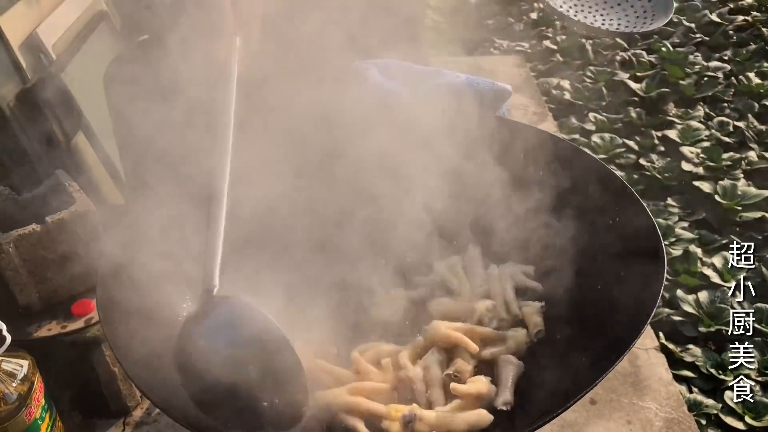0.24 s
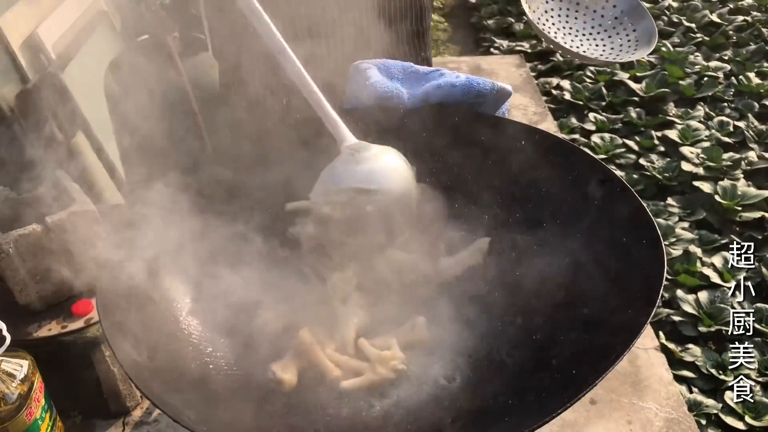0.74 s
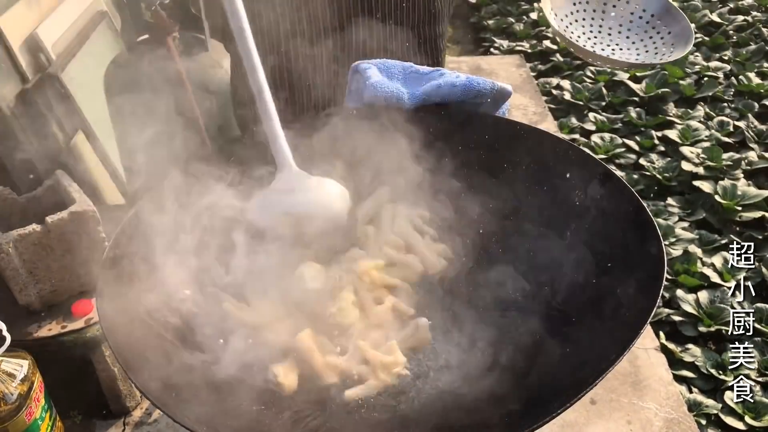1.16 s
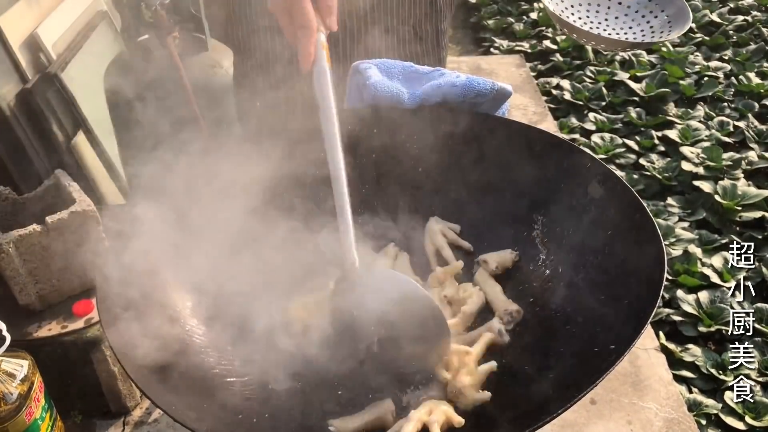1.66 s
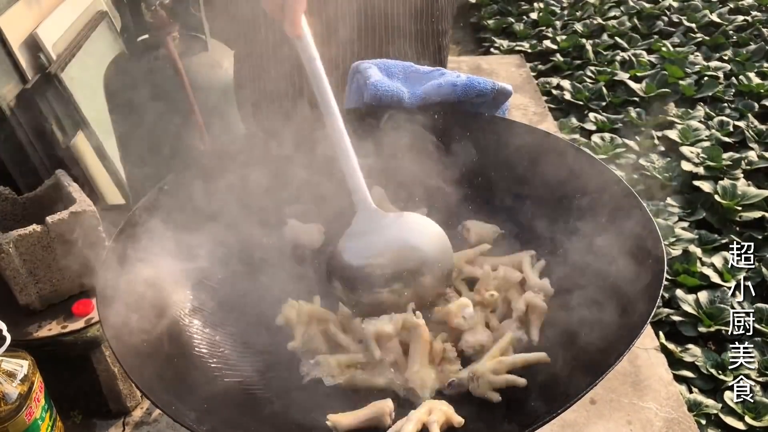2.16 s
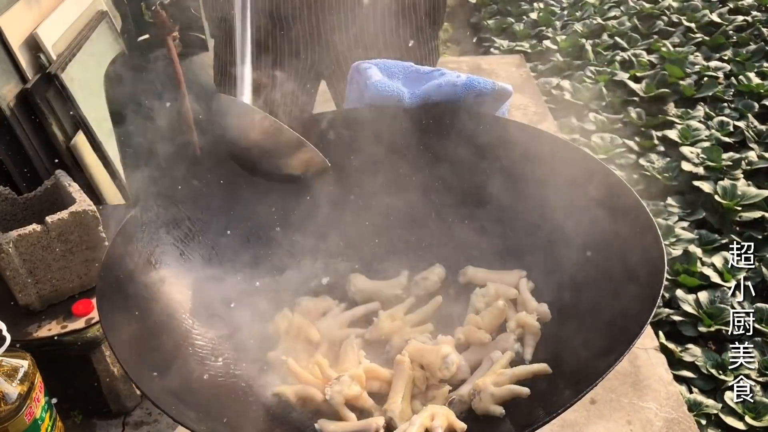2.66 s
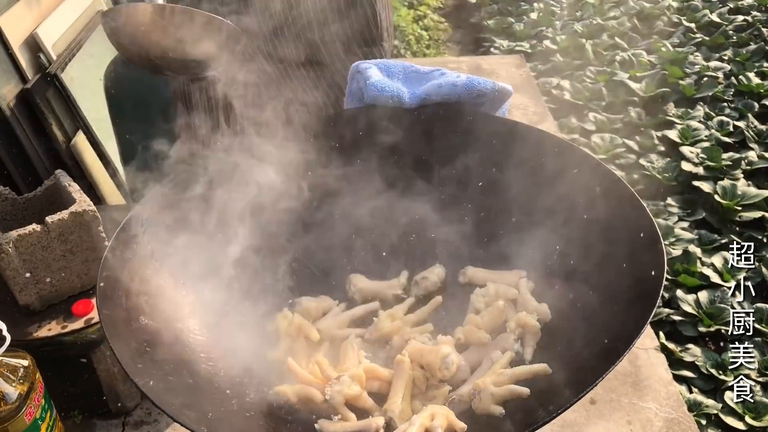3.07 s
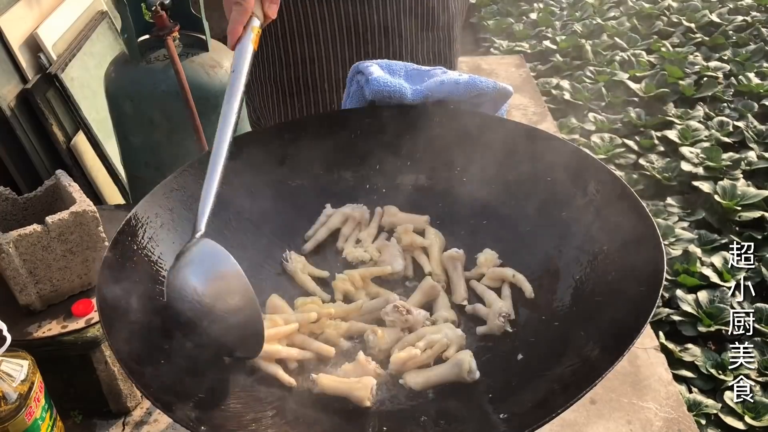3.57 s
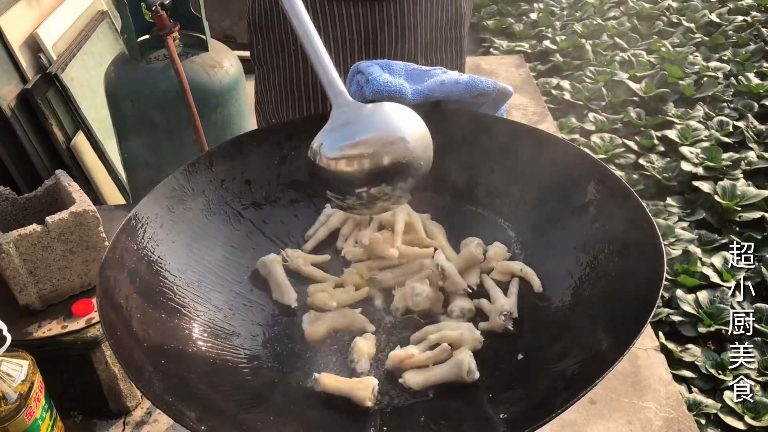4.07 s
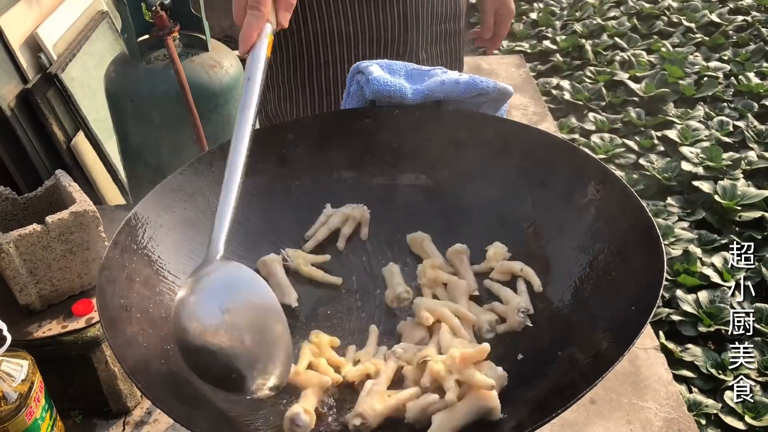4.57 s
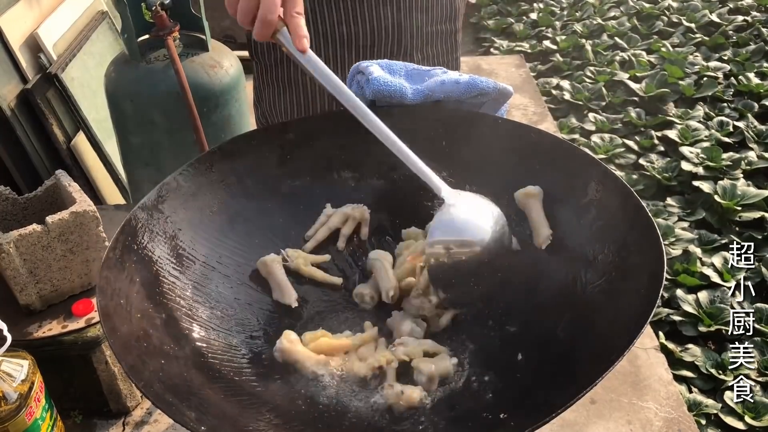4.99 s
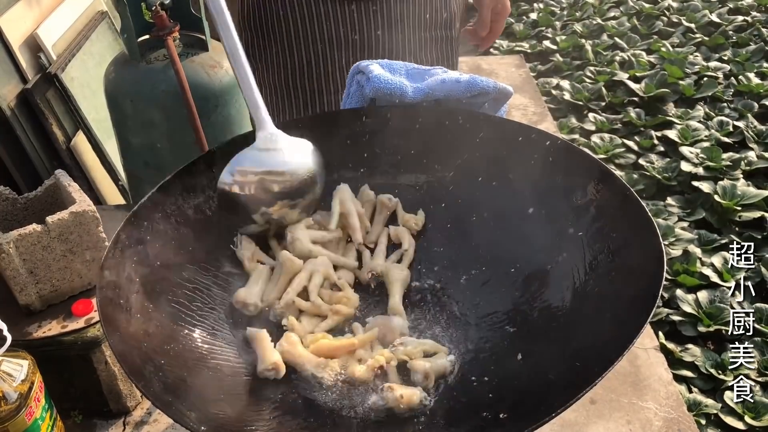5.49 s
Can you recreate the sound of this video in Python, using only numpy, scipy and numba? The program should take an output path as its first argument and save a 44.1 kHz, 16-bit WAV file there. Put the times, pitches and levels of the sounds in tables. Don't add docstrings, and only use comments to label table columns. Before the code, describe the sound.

Chicken feet sizzle violently in oil, close and dry, with no room echo. Bright hiss surges unevenly under hollow bursting bubbles and short soft ladle rubs on iron. A flurry of hard spits precedes a quieter, thinner fry; it swells back with scraping, small squeals and a late ladle knock. Burner rumble continues below, peaks clipped.

```python
import sys
import numpy as np
from scipy import signal
from scipy.fft import rfft, irfft, next_fast_len
from scipy.io import wavfile
from scipy.ndimage import uniform_filter1d, map_coordinates
from numba import njit

SR = 44100
rng = np.random.default_rng(int(sys.argv[2]) if len(sys.argv) > 2 else 0)


def gain_from_db(level_db):
    decades = np.asarray(level_db, float) / 20
    return 10 ** decades


def transcribe(signal):
    frames = np.atleast_2d(signal).T
    limited = np.clip(frames, -1, 1)
    pcm = np.round(limited * 32767).astype(np.int16)
    wavfile.write(sys.argv[1], SR, pcm)


N = 253127


def unit(x):
    return x / np.sqrt(np.mean(x ** 2) + 1e-20)


def curves(rows):
    s, *columns = np.transpose(rows)
    return [np.interp(np.arange(N) / SR, s, column) for column in columns]


def wobble(rate):
    knots = rng.standard_normal(int(N * rate / SR) + 4)
    return map_coordinates(knots, [np.arange(N) * rate / SR])


def filtered(x, response):
    m = next_fast_len(N + 8192)
    return irfft(rfft(x, m) * response(np.fft.rfftfreq(m, 1 / SR)), m)[:N]


def colour(points):
    f, db = np.transpose(points)
    return lambda hz: gain_from_db(np.interp(np.log(hz + 1), np.log(f + 1), db))


def resonance(f, hz, width_hz):
    return 1j * f * width_hz / (hz * hz - f * f + 1j * f * width_hz)


def rush(spectrum, patchy_db):
    z = signal.stft(rng.standard_normal(N), nperseg=256)[2]
    field = uniform_filter1d(rng.standard_normal(z.shape), 8, 0)
    field = unit(uniform_filter1d(field, 8, 1))
    patchy = signal.istft(z * gain_from_db(patchy_db * field), nperseg=256)[1][:N]
    return unit(filtered(patchy, colour(spectrum)))


def scatter(starts, shapes):
    where = np.clip(starts[:, None] + np.arange(shapes.shape[1]), 0, N)
    return np.bincount(where.ravel(), shapes.ravel(), N + 1)[:N]


def grains(count, size, hz, spread, cycles, scatter_db, cap_db):
    when, strength = rng.random((2, count))
    pitch = hz * np.exp(spread * rng.standard_normal((count, 1)))
    pitch = np.clip(pitch, 200, SR / 2.2)
    turns = pitch * np.arange(size) / SR
    peak = gain_from_db(np.minimum(-scatter_db * np.log(1 - strength), cap_db))[:, None]
    rings = peak * np.sin(2 * np.pi * turns) * gain_from_db(-30 * turns / cycles)
    return unit(scatter((when * N).astype(int), rings))


# (time [s], steam level [dB], boil under the food [dB], open view of the steam [dB], low when shaded)
FRY = [(0.0, -18, -20.5, -1), (0.3, -14.5, -17.5, -0.5), (1.12, -7.5, -14.5, 1), (1.32, -13, -10.5, -1),
       (1.56, -8, -18.5, 2), (1.9, -12, -22, 2), (2.33, -14.5, -20.5, 0), (2.8, -13, -18.5, 3),
       (3.2, -13.5, -20, 1), (3.55, -13, -16, -4), (3.68, -22.5, -30, -0.5), (4.05, -19, -33, 0.5),
       (4.3, -17, -37, -5.5), (4.46, -16, -30, -5), (4.53, -16.5, -19, 1.5), (5.16, -13, -28, -0.5),
       (5.5, -11.5, -22, -1), (5.74, -12.5, -14.5, -2.5)]
# (frequency [Hz], level [dB])
STEAM = [(1500, -20), (2400, -14), (3200, -4), (4200, -5), (5500, -6), (7500, -7.5), (10000, -11),
         (13000, -10), (16000, -6)]
FIZZ_DB, USUAL_STEAM_DB = -15, -13
FIZZ_FOLLOWS, FIZZ_SHADED = 0.42, 0.21


def sizzle():
    hiss_db, boil_db, bright_db = curves(FRY)
    fizz_db = FIZZ_DB - USUAL_STEAM_DB - (1 - FIZZ_FOLLOWS) * (hiss_db - USUAL_STEAM_DB)
    fizz_db = fizz_db - FIZZ_SHADED * bright_db
    hiss_db = hiss_db + gush_db()
    surge = 0.74 * wobble(14) + 0.083 * wobble(55) + 0.49 * wobble(200)

    crackle = grains(count=7000, size=48, hz=11000, spread=.36, cycles=7, scatter_db=4.6, cap_db=18.5)
    jets = rush(STEAM, patchy_db=1.0)
    steam = gain_from_db(-0.5) * jets + gain_from_db(-7.0) * unit(filtered(crackle, colour(STEAM)))
    top = filtered(steam, lambda f: 1 / (1 + (9000 / (f + 1)) ** 6))
    steam = steam + (gain_from_db(bright_db + 4 + 1.2 * wobble(40)) - 1) * top

    fizz = grains(count=9000, size=300, hz=3150, spread=.14, cycles=20, scatter_db=3.5, cap_db=12)
    boil = grains(count=6000, size=160, hz=2050, spread=.27, cycles=5, scatter_db=4.5, cap_db=11)
    snaps = grains(count=900, size=64, hz=3400, spread=.18, cycles=3, scatter_db=4.5, cap_db=11)
    ticks = grains(count=350, size=24, hz=13000, spread=.2, cycles=2, scatter_db=3, cap_db=9)
    steam = steam + gain_from_db(-12.5) * snaps + gain_from_db(-13.5) * ticks
    fizz_gain = gain_from_db(fizz_db - 6 + 0.11 * wobble(35) + 0.91 * wobble(7.01))
    hissing = gain_from_db(hiss_db + surge) * (steam + fizz_gain * fizz)
    return hissing + gain_from_db(boil_db - 7.0 + 3.4 * surge) * boil


# (centre time [s], half length
# [s], swell level [dB])
GUSHES = [(0.474, 0.045, 1), (0.77, 0.025, 6), (1.163, 0.054, 0), (1.6, .02, -2), (1.762, 0.019, 7.5),
          (2.146, 0.11, 2), (2.508, 0.14, 4), (3.228, 0.039, 2), (3.35, 0.045, 1), (3.52, .05, 3.5),
          (4.21, 0.057, -1), (4.75, 0.033, 1.5), (4.96, 0.048, 1), (5.17, 0.045, 3), (5.393, 0.083, -2),
          (0.214, 0.065, -1), (1.823, 0.022, -0.5), (5.525, 0.029, 2), (5.696, 0.024, 3)]


def gush_db():
    t = np.arange(N) / SR
    return sum(db * np.exp(-((t - s) / half) ** 2) for s, half, db in GUSHES)


# (time [s], peak level [dB], first pitch [Hz], ring length [cycles])
DEEP_POPS = [(0.2326, -8, 960, 3.1), (0.533, -4.5, 1090, 1.3), (0.6544, -1, 1390, 0.99),
             (0.7599, -2.5, 1350, 2.5), (0.8906, -7, 1020, 2.2), (0.9363, -3.5, 1110, 1.8),
             (0.992, 7, 820, 1.2), (1.009, 4, 1110, 1.6), (1.229, -1.5, 1050, 1.9), (1.2609, -2, 1010, 2.3),
             (1.2758, 4, 1060, 1.3), (1.3413, 1, 1690, 3.2), (1.3667, -3, 820, 1), (1.4544, 2, 1450, 2.7),
             (1.557, 1, 1270, 3.2), (1.63, -3, 1200, 2.3), (1.817, -6.5, 805, 1.5), (2.6429, 6, 1100, 1.7),
             (2.8623, 7.5, 1280, 2.2), (2.932, 0, 1170, 1.8), (3.099, -5, 1050, 2.2),
             (3.1552, -1.5, 1220, 1.5), (3.225, -1.5, 895, 2.6), (3.2847, -5, 1280, 2.3),
             (3.5509, -3.5, 750, 1.8), (3.5657, -1, 1310, 3.9), (3.7332, -6.5, 990, 1.8),
             (3.8224, -5, 1020, 3), (3.9663, 2, 1500, 3.7), (5.6635, -13, 790, 2.2)]
# (time [s], peak level [dB], first pitch [Hz], ring [cycles])
SURFACE_POPS = [(0.0904, -7, 1440, 2.5), (0.1322, -3, 1370, 1.1), (0.5816, -8, 1300, 4.5),
                (0.947, -10, 1500, 1.4), (1.1321, 1, 1520, 1.3), (1.247, -5, 1100, 2.5),
                (1.3465, 3, 1960, 4.6), (1.5001, 0, 1490, 0.89), (1.5413, -4, 1350, 5.4),
                (1.784, -2.5, 1400, 2.7), (2.1198, -5.5, 1440, 0.9), (2.1928, -2.5, 1370, 1.9),
                (2.2078, 3, 960, 3.8), (2.4315, -6, 1320, 2.1), (2.6897, 0.5, 1340, 0.81),
                (2.9195, -2, 1420, 1.7), (2.9937, -2, 1530, 0.99), (3.1126, -0.5, 1270, 1.7),
                (3.2116, -6, 1230, 1.9), (3.2325, 2, 1360, 1.4), (3.6209, -3, 1700, 2.2),
                (3.8804, -2.5, 1340, 0.68), (3.9478, 4, 1660, 2.1), (4.5145, -2, 1650, 1.3),
                (4.582, 0, 1380, 1), (4.6064, 3.5, 1610, 2.1), (4.752, -1, 1490, 1),
                (5.3061, -3, 1420, 0.92), (5.5455, 0, 1360, 1.5), (5.596, 0.5, 940, 3.3),
                (5.613, 0, 1500, 2.5)]
# (time [s],
# peak level [dB], first pitch [Hz])
LESSER_POPS = [(0.0261, -9.5, 1200), (0.3061, -13, 1230), (0.3748, -7, 1910), (0.5674, -10, 1080),
               (0.6036, -6.5, 1140), (0.671, -8, 1200), (0.768, -2, 1320), (1.098, -3, 1430),
               (1.1172, -5, 1250), (1.1655, -5, 1210), (1.4673, -1, 1390), (1.4883, -4, 1200),
               (1.597, -4, 1360), (1.7196, -9.5, 1520), (1.7688, -5, 1260), (1.969, -17, 1410),
               (2.852, -8, 1260), (2.984, -7, 1220), (3.0448, -8, 1490), (3.3495, -7, 1640),
               (3.4824, -8.5, 1210), (3.8375, -11, 1460), (3.9138, -3, 1430), (3.9258, -10, 1390),
               (3.954, -11, 1500), (3.959, -10, 1400), (3.972, -6, 1200), (3.9923, -7.5, 1360),
               (4.326, -10, 1430), (4.589, -5, 1390), (5.646, -10, 800), (5.671, -6, 900),
               (5.678, -11, 750)]
# (time [s], peak level [dB], first pitch [Hz])
TINY_POPS = [(0.01, -2.5, 904), (0.052, -10, 1030), (0.073, -11, 1760), (0.114, -6, 1710), (0.14, -2, 1890),
             (0.217, -8, 1650), (0.263, -16, 1930), (0.277, -7, 2150), (0.33, -3, 2220), (0.49, -10, 1270),
             (0.679, -5, 1670), (0.754, 1, 1770), (0.862, -6, 2240), (1.148, -5, 2080), (1.213, -6, 1840),
             (1.297, -7, 1550), (1.315, -7, 1860), (1.384, -4, 912), (1.408, -11, 2220), (1.524, -11, 2000),
             (1.751, 4, 1120), (1.955, -12, 1920), (1.96, -7, 1940), (2.082, -3, 1920), (2.097, -5, 1840),
             (2.15, -1, 1760), (2.17, 0, 2170), (2.264, -9, 1850), (2.387, -6, 1690), (2.517, 3, 1980),
             (2.594, -5, 1610), (2.616, 3, 2150), (3.01, -2, 1480), (3.03, -10, 1960), (3.375, -5, 2230),
             (3.41, -5, 2300), (3.446, -7, 1890), (3.638, -6, 1730), (3.666, -3, 2150), (4.212, -19, 2180),
             (4.334, -14, 2300), (4.359, -8, 2070), (4.412, -5, 1420), (4.448, -13, 1600),
             (4.479, -9, 1980), (4.569, -2, 1730), (4.964, -3, 1810), (5.164, -17, 1740),
             (5.443, -15, 2300), (5.468, -20, 2010), (5.491, -3, 1550), (5.516, -9, 1730)]
DEEP_BOOM_DB, SURFACE_BOOM_DB, BOOM_DB_PER_OCTAVE = -7, -16.5, -6
LESSER_CYCLES, LESSER_BOOM_DB = 2.4, -12
TINY_DB, TINY_CYCLES, TINY_BOOM_DB = -6, 2.7, -18
SMALL_DB, SMALL_SCATTER_DB, SMALL_BOOM_DB = -4, 1.5, -14.5
SMALL_HZ, SMALL_SPREAD, SMALL_CYCLES = 1400, .25, 2.5


def pockets(count=260):
    luck = rng.standard_normal((count, 4))
    jitter = .4 * luck[:, 0].clip(-1.2, 1.2)
    when = (np.arange(count) + .5 + jitter) / count * (N - 1)
    boil_db = curves(FRY)[1][when.astype(int)]
    small = np.c_[when / SR,
                  boil_db + SMALL_DB + SMALL_SCATTER_DB * luck[:, 1],
                  SMALL_HZ * np.exp(SMALL_SPREAD * luck[:, 2]),
                  SMALL_CYCLES * np.exp(.3 * luck[:, 3])]
    lesser = np.c_[LESSER_POPS, np.full(len(LESSER_POPS), LESSER_CYCLES)]
    tiny = np.c_[np.add(TINY_POPS, [0, TINY_DB, 0]), np.full(len(TINY_POPS), TINY_CYCLES)]
    kinds = [(DEEP_POPS, DEEP_BOOM_DB), (SURFACE_POPS, SURFACE_BOOM_DB), (small, SMALL_BOOM_DB),
             (lesser, LESSER_BOOM_DB), (tiny, TINY_BOOM_DB)]
    s, db, hz, cycles = np.vstack([rows for rows, _ in kinds]).T
    boom_db = np.concatenate([np.full(len(rows), base_db) for rows, base_db in kinds])
    return np.array([s, db, hz, boom_db + BOOM_DB_PER_OCTAVE * np.log2(hz / 1200), cycles])


BOWL_HZ = 410


def pops(glide=0.388):
    s, db, hz, boom_db, cycles = pockets()[:, :, None]
    lead = 64
    t = (np.arange(640) - lead) / SR
    luck = rng.random((len(s), 2))
    turns = np.log(np.maximum(1 + glide * hz * t, .05)) / glide
    rise = np.clip((turns + 1.05) / .55, 0, 1)
    decay = gain_from_db(-22 * (np.maximum(turns, 0) / np.maximum(cycles, 1)) ** 1.1)
    ring = decay * np.cos(2 * np.pi * turns)
    spray = uniform_filter1d(rng.standard_normal(turns.shape), size=7) * gain_from_db(-7 - 60 * np.abs(t) / .016)
    late = np.maximum(t - .0012, 0)
    bowl_turns = BOWL_HZ * (0.87 + 0.15 * luck[:, :1]) * late * (1.2 - 30 * late)
    fade = np.hanning(2 * len(t))[len(t):]
    boom = gain_from_db(boom_db + 6 - 60 * late / 0.017) * np.sin(2 * np.pi * bowl_turns) * fade
    click = gain_from_db(-9 - 60 * np.abs(t) / 0.0008) * np.cos(2 * np.pi * 3000 * t)
    shapes = gain_from_db(db - 0.5) * (rise * (ring + spray) + click + boom)
    return scatter(np.round(s[:, 0] * SR).astype(int) - lead, shapes)


# (time [s], peak level [dB])
SPITS = [(1.8153, -3), (2.8603, -18), (3.357, -8), (3.3758, -6), (3.5334, -8), (3.552, -4), (3.5657, -9),
         (3.591, -6), (3.619, -10.5), (3.64, -6), (3.6657, -10), (3.7322, -4.5), (3.8198, -6.5),
         (3.838, -14), (3.8601, -4), (3.878, -9), (3.9294, -23), (4.06, -16), (4.1833, -22.5),
         (4.2503, -12), (4.3359, -10), (4.4047, -13), (4.414, -6), (4.5557, -10), (4.6203, -3), (5.479, -4),
         (5.4924, -3)]
# (time [s], peak level [dB])
FLECKS = [(0.131, -9), (0.2078, 2), (0.245, 0), (0.3027, -5), (0.3734, -6), (0.5394, -2), (0.885, -13),
          (1.2454, 4), (1.317, -1), (2.16, -8), (2.5254, 0), (3.4286, -1), (3.4814, -4), (3.4965, 1.5),
          (3.5194, 1), (3.5823, -4), (3.717, 0), (3.7494, -7), (3.8515, -5), (3.9484, -2), (4.17, -2),
          (4.1935, 1.5), (4.3121, -9), (4.3524, -5), (4.5005, -3), (4.8958, -5), (5.3038, -6), (5.5025, 0),
          (5.6904, -2)]
FLECK_DB = -7.5


def spits():
    s, db = np.vstack([SPITS, np.add(FLECKS, [0, FLECK_DB])]).T
    t = np.arange(120) / SR
    crack = 1.95 * np.cos(2 * np.pi * 3500 * t) * gain_from_db(-60 * t / 0.00047)
    spray = gain_from_db(-60 * t / 0.0036) * rng.standard_normal((len(s), len(t)))
    snap = gain_from_db(db[:, None] + 5.5) * (crack + spray)
    snaps = scatter(np.round(s * SR).astype(int) - 8, snap)
    return filtered(snaps, lambda f: f * f / (f * f + 1100 ** 2))


def blips(rows, rise_s, t60):
    s, db, hz = np.transpose(rows)[:, :, None]
    t = np.arange(1600) / SR
    ragged = 1 + .4 * unit(uniform_filter1d(rng.standard_normal((len(s), len(t))), size=60))
    swell = ragged * (1 - np.exp(-t / rise_s)) * gain_from_db(db - 60 * t / t60)
    song = np.sin(2 * np.pi * hz * t * (1 + 0.61 * t))
    return scatter(np.round(s[:, 0] * SR).astype(int), swell * song)


# (time [s], peak level [dB], pitch [Hz])
GURGLES = [(1.2275, 3, 1000), (1.2745, 4, 1040), (1.345, -3, 1860), (1.346, 3, 2670), (2.105, 1, 1770),
           (2.158, 3, 2580), (2.171, -1, 2170), (2.2055, 0, 970), (2.346, -6, 1290), (3.294, -5, 2300),
           (3.315, -7, 2190), (3.347, 3, 2960), (3.357, 2, 2400), (3.389, -0.5, 2250), (3.457, 0, 2500),
           (4.524, -9.5, 2340), (4.918, -6, 2320), (4.993, -1.5, 2170), (3.848, -3, 2350), (5.6, -2, 1040),
           (5.684, -2, 3400), (5.52, -4, 2880), (5.71, -1, 3500), (0.332, -3.5, 2580), (4.225, -5, 2800),
           (5.693, 1, 2350)]
# (time [s], peak level [dB], pitch [Hz])
BLIPS = [(0.3726, 1, 3200), (0.6694, 15, 3080), (1.4088, 21, 2740), (1.5512, 12, 2870), (1.8132, 10, 3900),
         (2.2049, 8, 3380), (2.9916, 8, 3700), (3.1527, 8, 3200), (3.2944, -5, 3080), (3.39, 10, 3150),
         (3.617, 7, 3070), (3.639, 0, 3000), (3.6657, 3, 2900), (3.7314, 8, 4130), (3.9459, 7, 1820),
         (4.386, 4, 3170), (5.469, 8.5, 2900)]
# (time [s], peak level [dB], pitch [Hz])
WHISTLES = [
    (3.95, -14, 1510),
    (5.122, -13, 4770),
    (5.128, -11, 2960),
    (5.16, -12, 3150),
    (5.2, -10, 4410),
    (5.19, -11, 3460),
]


def bubbles():
    gurgles = gain_from_db(2) * blips(GURGLES, rise_s=0.001, t60=0.012)
    return gurgles + blips(BLIPS, rise_s=0.0015, t60=0.0065) + blips(WHISTLES, rise_s=0.0017, t60=0.14)


# (start time [s], hold [s], pressure level [dB])
STROKES = [(0.0, 0.022, -34), (0.53, .2, -42), (1.002, 0.018, -25.5), (1.36, 0.055, -27.5),
           (1.56, .02, -32), (1.74, .06, -31), (2.193, 0.057, -25.5), (2.63, 0.025, -32.5),
           (3.093, .14, -42), (3.454, .02, -34.5), (3.964, .03, -35), (4.577, 0.17, -48.5),
           (4.817, 0.2, -31), (5.06, 0.21, -28), (5.605, 0.018, -26), (5.65, 0.028, -19.5)]
PRESS_DB_PER_S, LIFT_DB_PER_S, REST_DB = 450, 200, -50


def pressure_db():
    s, hold, db = np.transpose(STROKES)[:, :, None]
    t = np.arange(0, N, 64) / SR
    press = PRESS_DB_PER_S * np.maximum(s - t, 0)
    lift = LIFT_DB_PER_S * np.maximum(t - s - hold, 0)
    strongest = (db - press - lift).max(axis=0)
    return np.interp(np.arange(N) / SR, t, np.maximum(strongest, REST_DB))


# (frequency [Hz], width [Hz], level [dB])
WOK = [(155.6, 29, -5.5), (429, 34, -6), (620, 33, -12), (884, 11, -11)]


def iron(f):
    return sum((-1) ** k * gain_from_db(db) * resonance(f, hz, w) for k, (hz, w, db) in enumerate(WOK))


def scrape():
    rub = unit(filtered(gain_from_db(1.8 * wobble(70)) * rng.standard_normal(N), iron))
    return gain_from_db(pressure_db() + 1.0) * rub


# (frequency [Hz], level [dB])
BURNER = [(12, -46), (20, -90), (327, 11.5), (462, 6.5), (629, 10), (763, 1), (873, 13), (980, -8),
          (2000, 4.5), (2600, -49), (4400, -120)]
# (time [s], level [dB])
RUMBLE = [
    (0, -3.5),
    (0.7, -5),
    (3.3, 4),
    (5.2, 12),
    (5.74, 0),
]


def flame():
    roar = rush(BURNER, patchy_db=0.5)
    rumble = filtered(roar, lambda f: 1 / (1 + (f / 130) ** 4))
    roar = roar + (gain_from_db(curves(RUMBLE)[0]) - 1) * rumble
    return gain_from_db(-32.0 + 0.35 * wobble(2.5)) * roar


# (time [s], length [ms], depth level [dB])
DUCKS = [(1.559, 6.8, -9), (1.816, 8.9, -10), (1.849, 5.3, -5), (1.942, 6.6, -7), (2.195, 7.8, -10.5),
         (3.416, 3.9, -4), (3.485, 7.7, -9), (3.556, 7.9, -11), (3.565, 10.4, -14), (3.625, 6.7, -16),
         (3.738, 5.8, -6), (3.84, 6.6, -9), (3.862, 10, -2), (4.559, 6.4, -12), (5.435, 4.8, -5),
         (5.483, 5.3, -8.9), (5.494, 7.3, -8)]


def ducking():
    db = np.zeros(N)
    for s, ms, depth_db in DUCKS:
        db[round(s * SR) - 40:][:round(ms / 1000 * SR) + 40] = depth_db
    return gain_from_db(uniform_filter1d(db, size=50))


def scene():
    bursts = pops() + bubbles()
    bursts = filtered(bursts, lambda f: f ** 4 / (f ** 4 + 160 ** 4) + gain_from_db(-37.0) * iron(f))
    steady = sizzle() + scrape() + flame()
    return (ducking() * steady + bursts + spits())[None]


@njit
def held(over, release):
    out, level = np.empty_like(over), 1.0
    for i in range(len(over)):
        level = max(over[i], 1 + (level - 1) * release)
        out[i] = level
    return out


MIC_HZ, MIC_WIDTH_HZ, MIC_DB = 3150, 4800, 3.5
TOP_HZ = 15780


def top_cut(x):
    return signal.sosfilt(signal.butter(12, 16970, fs=SR, output="sos"), x)


def record(dry):
    port = lambda f: 1 + (gain_from_db(MIC_DB) - 1) * resonance(f, MIC_HZ, MIC_WIDTH_HZ)
    mic = filtered(dry[0], lambda f: port(f) * f * f / (f * f + 45 ** 2))
    over = held(np.maximum(np.abs(mic) / 1.73, 1), np.exp(-1 / (0.0081 * SR)))
    late = np.pad(over, (45, 0), "edge")[:N]
    mic = mic / uniform_filter1d(late, size=30) ** 1.01
    clipped = mic / (1 + np.abs(mic / 0.99) ** 6) ** (1 / 6)
    mix = filtered(clipped, lambda f: f < TOP_HZ)[None]
    return top_cut(mix)


dry = scene()
out = record(dry)
transcribe(out)
```